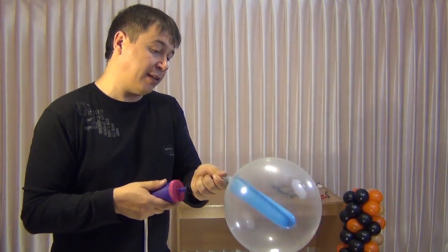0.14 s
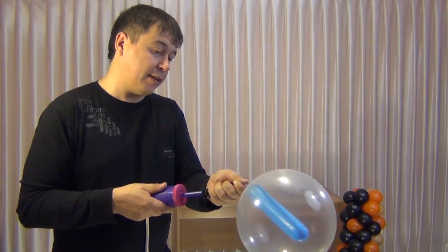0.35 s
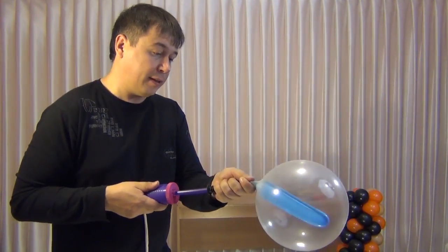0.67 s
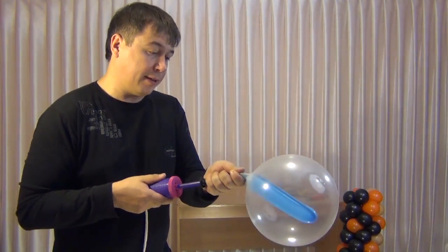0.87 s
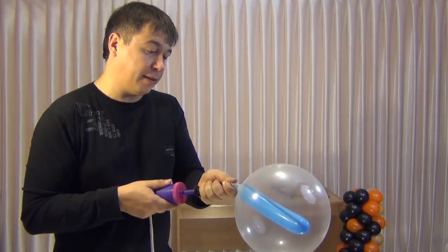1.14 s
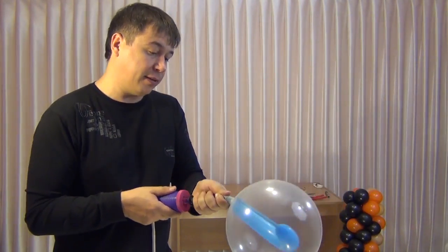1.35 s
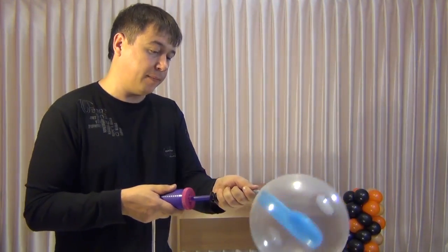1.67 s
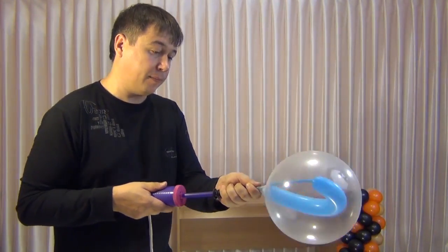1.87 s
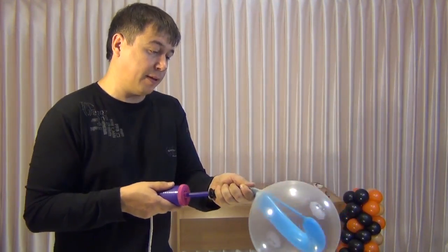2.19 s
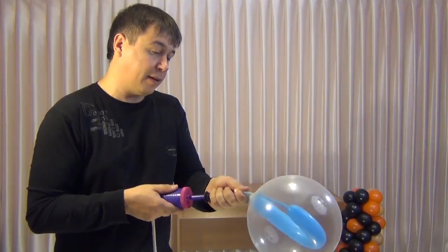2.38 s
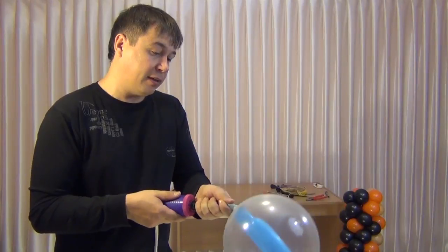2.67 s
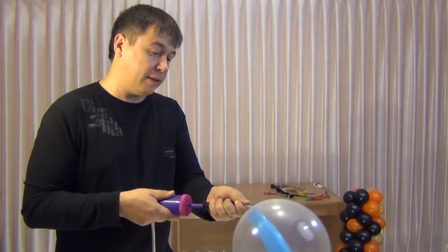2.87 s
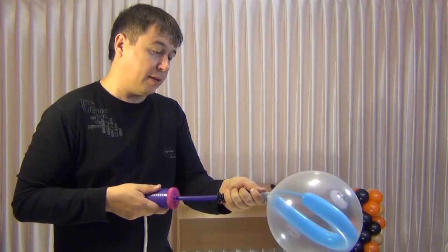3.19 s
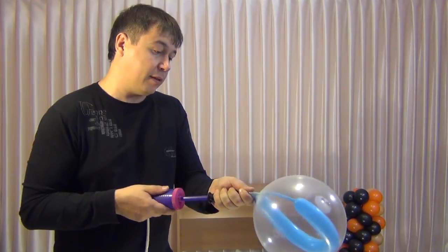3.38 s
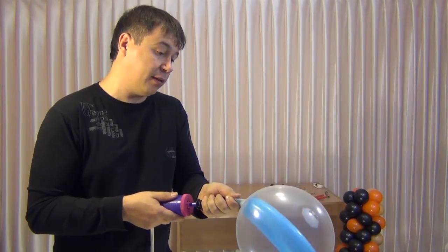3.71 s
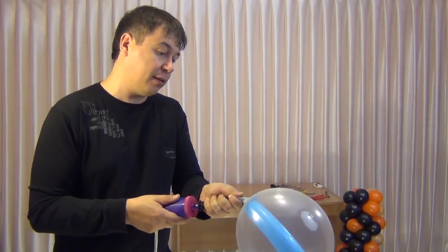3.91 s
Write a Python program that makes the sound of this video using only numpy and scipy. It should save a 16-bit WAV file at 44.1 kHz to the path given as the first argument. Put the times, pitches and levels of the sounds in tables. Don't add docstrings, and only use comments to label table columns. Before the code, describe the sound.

Close stereo sound of a plastic hand pump filling a latex balloon in a small reflective room. It opens mid-push with bright hiss and a trembling valve squeal near 1.7 kHz until about 0.2 s, then a soft bump at 0.38. A weak, thin intake follows, ending in a plastic clack at 0.95. From 1.1 to 1.6 s an even, whistling push hisses steadily and stops with a firm, higher bump at 1.65. A fuller intake runs to a brighter clack at 2.2. At 2.4 a sudden strong push starts with a falling chirp and reedy squeal, ending around 2.88 in the hardest, highest knock with rattling rebounds. A quick intake leads to ticks and a duller clack at 3.42. The last push swells more slowly from 3.5 to about 4 s. Soft room noise and a faint low drone, swelling near 0.6 and 2.4, sit behind, dipping during strokes.

```python
import sys
import numpy as np
from scipy import signal
from scipy.io import wavfile
from scipy.ndimage import uniform_filter1d

SR = 44100
rng = np.random.default_rng(int(sys.argv[2]) if len(sys.argv) > 2 else 0)


def bounce(signal):
    frames = np.transpose(np.atleast_2d(signal))
    limited = np.clip(frames, -1, 1)
    pcm = np.round(limited * 32767).astype(np.int16)
    wavfile.write(sys.argv[1], SR, pcm)


def gain_from_db(level_db):
    decades = np.asarray(level_db, float) / 20
    return 10 ** decades


N = 178264
CLOCK = np.arange(N) / SR

# time [s], level [dB], lead of the grip thud [s],
# extra snap above 2100 Hz [dB per octave].
CLACKS = [
    (.9545, -18, .0155, 0),
    (2.2147, -15.5, .0237, 1),
    (3.4214, -22, .0344, -6),
]
# time [s], level [dB], pitch [Hz].
BUMPS = [
    (0.3807, -26, 420),
    (1.6509, -11.5, 778),
    (2.8755, -10.5, 1270),
]


def evened(x):
    return x / np.sqrt(np.mean(x ** 2) + 1e-20)


def read(points, hz):
    f, value = np.transpose(points)
    return np.interp(np.log(hz + 1), np.log(f + 1), value)


def add(mix, s, sound):
    at = round(s * SR)
    part = mix[max(at, 0):][:len(sound) + min(at, 0)]
    part += sound[max(-at, 0):][:len(part)]


def follow(rows):
    s, *columns = np.transpose(sorted(rows))
    t = np.arange(s[0], s[-1], 1 / SR)
    return t, [np.interp(t, s, c) for c in columns]


def wander(count, seconds):
    size = max(int(seconds * SR), 2)
    smooth = uniform_filter1d(rng.standard_normal(count), size)
    return evened(uniform_filter1d(smooth, size))


def linger(db, per_s):
    return np.maximum.accumulate(db + per_s * CLOCK) - per_s * CLOCK


def resonate(x, hz, width):
    turn = np.exp(2j * np.pi * hz * np.arange(len(x)) / SR)
    r = np.exp(-np.pi * width / SR)
    return 2 * (turn * signal.lfilter([1 - r], [1, -r], x / turn)).real


def noise(size, streak_db, flicker_db, frames_long):
    frames, bins = 4 * N // size + 5, size // 2 + 1
    a, b, c, d, streaks, flicker = rng.standard_normal((frames, bins, 6)).T
    streaks = uniform_filter1d(streaks, 2, axis=0)
    streaks = evened(uniform_filter1d(streaks, int(frames_long), axis=1))
    flicker = uniform_filter1d(flicker, bins // 3, axis=0)
    flicker = evened(uniform_filter1d(flicker, 3, axis=1))
    return np.array([a + 1j * b, c + 1j * d]) * gain_from_db(streak_db * streaks + flicker_db * flicker)


def sound_of(z):
    size = 2 * (z.shape[1] - 1)
    return signal.istft(z, nperseg=size, noverlap=3 * size // 4)[1][:, :N]


def effort():
    # time [s], air flow [dB], piston drive [dB].
    pushes = [
        [(-.12, -25, -11), (.09, -21.5, -4), (.2, -22, -11.5), (.286, -22, -12), (.41, -46, -28), (.5, -49, -2)],
        [(1.07, -43, -1), (1.165, -22, -5), (1.23, -21.5, -6), (1.45, -22.5, -1), (1.55, -22, -17.5),
         (1.655, -41, -25), (1.685, -60, -19)],
        [(2.375, -45.5, -1), (2.404, -41, 5), (2.416, -21.5, -5), (2.6, -19.5, -5.5), (2.712, -22.5, -13.5),
         (2.822, -44.5, -30), (2.915, -46, -14)],
        [(3.435, -42, -16), (3.455, -31.5, -8), (3.514, -24, -13), (3.62, -19.5, -19), (3.77, -21.5, -2.5),
         (3.945, -23, -11), (3.99, -33, -11), (4.05, -31.5, -7)],
    ]
    pulls = [
        [(.51, -44.5, -6), (.68, -35.5, -4), (.88, -37, -6.5), (.92, -50, -1), (1.04, -47, -6)],
        [(1.695, -45, -8), (1.72, -31.5, -3), (1.79, -26.5, -4.5), (2.05, -23.5, -4.5), (2.19, -38, -7),
         (2.33, -68, -10)],
        [(2.92, -53, -14), (2.94, -32, -9), (3.02, -26, -6), (3.194, -22.5, -8), (3.31, -33, -6.5),
         (3.35, -31, -9), (3.37, -39, -20), (3.42, -35, -7)],
    ]
    clack_puff_db, bump_puff_db, puff_fade = -20, -28.5, 290
    build_s = 0.39
    s, flow_db, drive_db = np.transpose(sorted(sum(pushes + pulls, [])))
    power = gain_from_db(2 * np.interp(CLOCK, s, flow_db))
    puffs = [(c[0], c[1] + clack_puff_db) for c in CLACKS]
    puffs += [(b[0], b[1] + bump_puff_db) for b in BUMPS]
    for at, db in puffs:
        power = power + (CLOCK > at) * gain_from_db(2 * (db - puff_fade * abs(CLOCK - at)))
    strokes = [(p[0][0], 0) for p in pushes] + [(p[0][0], 1) for p in pulls]
    starts, pulling = np.transpose(sorted(strokes))
    stroke = np.maximum(np.searchsorted(starts, CLOCK) - 1, 0)
    built = np.clip((CLOCK - starts[stroke]) / build_s, 0, 1)
    return 10 * np.log10(power), np.interp(CLOCK, s, drive_db), built, pulling[stroke]


def hiss(flow_db, drive_db, built, pulling):
    # frequency [Hz], level [dB per Hz].
    nozzle = [(410, -29), (700, -22), (1180, -19.5), (1750, -14), (1940, -18.5), (2100, -17.5),
              (3590, -11.5), (3880, -8.5), (5520, -2.5), (7460, -8), (9940, 6.5), (10900, 3), (12300, -8.5),
              (15100, -5.5), (15900, -37)]
    # frequency [Hz], side minus mid [dB].
    wide = [(700, -16), (2400, -18), (4000, -13), (5200, -15.5), (6500, -7), (8300, -3.5), (9600, -14.5),
            (10800, -19), (13000, -17), (16000, -13)]
    # level over the flow [dB], share of the drive [0-1],
    # lingering [dB per s], build-up [dB], change on pull strokes [dB].
    layers = [
        (0, 0.015, 900, 0, -0.5),
        (-8.5, 0.27, 126, 6, -2),
        (-3, 1.0, 900, 3, 0.5),
        (-25.5, 0.27, 84, 7.5, -4.5),
    ]
    hz = np.fft.rfftfreq(1024, 1 / SR)
    z = noise(size=1024, streak_db=2.2, flicker_db=0.6, frames_long=22)
    z *= gain_from_db(read(nozzle, np.minimum(hz, 15200)))[:, None]
    z[1] *= gain_from_db(read(wide, hz) - 2.0)[:, None]
    crossovers = ((2700, .9), (7000, .5), (12500, .3))  # Hz, width of the crossfade
    above = [np.clip(.5 + np.log((hz + 1) / edge) / spread, 0, 1) for edge, spread in crossovers]
    shares = [above[1] - above[2], above[0] - above[1], above[2], 1 - above[0]]
    out = np.zeros((2, N))
    for share, (db, driven, per_s, build_db, pull_db) in zip(shares, layers):
        band = sound_of(z * np.sqrt(share)[:, None])
        level_db = flow_db + db + driven * drive_db + build_db * built + pull_db * pulling
        out += band / np.std(band[0]) * gain_from_db(linger(level_db, per_s))
    return out


def whistles():
    # start [s], end [s], pitch [Hz], width
    # [Hz], level [dB].
    resonances = [(-.08, 0.16, 1247, 152, -36), (.17, 0.35, 7870, 350, -29),
                  (0.171, 0.27, 8940, 300, -25.5), (0.199, 0.38, 9500, 100, -36),
                  (.6, 0.99, 4030, 300, -47.5), (-.08, 0.17, 5020, 161, -26.5),
                  (-.05, 0.1, 2710, 466, -32.5), (0.17, 0.22, 5920, 200, -29), (0, 4.4, 261.4, 25.2, -64),
                  (1.08, 1.37, 5600, 695, -29.5), (1.1, 1.42, 8100, 500, -31), (1.15, 1.63, 7050, 294, -33),
                  (1.201, 1.67, 9100, 200, -31.5), (1.799, 1.9, 5670, 200, -37.5),
                  (2.498, 2.72, 9300, 200, -28), (3.002, 3.25, 5560, 300, -40),
                  (3.602, 3.95, 4940, 314, -34), (3.552, 3.95, 9440, 200, -30.5)]
    out = np.zeros(N)
    for start, end, hz, width, db in resonances:
        x = rng.standard_normal(round((end - start) * SR))
        tone = evened(resonate(resonate(x, hz, width), hz, width))
        add(out, start, gain_from_db(db) * tone * signal.windows.tukey(len(x), .6))
    return out


def squeal(rows, harmonics_db):
    t, (hz, db, overtones_db) = follow(rows)
    turns = np.cumsum(hz * (1 + .018 * wander(len(t), .0015))) / SR
    tone = np.zeros(len(t))
    for k, h in enumerate(harmonics_db):
        stutter_db = 3 * wander(len(t), .002)
        level = gain_from_db(db + h + (k > 0) * overtones_db + stutter_db)
        tone += level * np.cos(2 * np.pi * ((k + 1) * turns + rng.random()))
    return t[0], tone


def squeals():
    # time [s], pitch [Hz], level [dB], lift of the overtones [dB].
    glides = [
        [(0, 1630, -24, 0), (.045, 1648, -21, 0), (.057, 1660, -30, 5), (.066, 1680, -23, 0),
         (.095, 1660, -30, 5), (.128, 1750, -24, -3), (.172, 1715, -29, -3), (.2, 1700, -44, 0)],
        [(2.398, 4500, -48, 0), (2.408, 4480, -34, 0), (2.4125, 4400, -24, 0), (2.415, 3400, -25, 0),
         (2.418, 2200, -33, 0)],
        [(2.4115, 1770, -48, 13), (2.415, 1800, -34, 13), (2.436, 1910, -34, 13), (2.458, 1915, -31, 5),
         (2.478, 1900, -39, 10), (2.49, 1910, -32, 3), (2.505, 1920, -41, 9), (2.565, 1960, -40, 2),
         (2.61, 2000, -50, 2)],
    ]
    # levels of a squeal's harmonics, from the fundamental up [dB].
    flap_db = [
        [2, -15, -11],
        [0, -25],
        [1, -5, 2, -8, -3, -6, -14],
    ]
    out = np.zeros(N)
    for rows, harmonics_db in zip(glides, flap_db):
        add(out, *squeal(rows, harmonics_db))
    return out


def knock(s, db, hz, cycles):
    u = np.arange(round(cycles / hz * SR)) * hz / cycles / SR
    shape = np.sin(np.pi * u ** 0.69) ** 2
    push = -np.sin(2 * np.pi * cycles * u) * shape
    return s, gain_from_db(db) * (push - shape * push.sum() / shape.sum())


def blows():
    # time [s], peak [dB], pitch [Hz], length [cycles].
    ticks = [(.342, -27, 2150, 3.5), (.3733, -26, 1760, 3.1), (.888, -38, 390, 3),
             (.8953, -29.5, 900, 1.35), (.8955, -30, 2300, 2.1), (1.648, -29, 2960, 3.1),
             (2.7725, -32.5, 800, 1.04), (2.79, -41, 1410, 4.2), (2.815, -49, 1200, 1.3),
             (2.855, -63, 1750, 3.5), (2.873, -15, 1010, 2.33), (2.8805, -11, 1330, 7.3),
             (2.911, -19.5, 1330, 5.5), (3.352, -37, 740, 1.5), (3.368, -34, 1900, 1.9),
             (3.378, -41, 1900, 4.6)]
    # pitch [Hz], level [dB], length [cycles].
    cap = [(265, -8.5, 2.34), (561, -3, 1.24), (1140, 1, 1.54), (1570, 0.5, 2.06), (2045, 0.5, 4.4),
           (3060, -2, 4.23), (3720, -4.5, 6.5), (6060, -10.5, 5.5)]
    # pitch ratio, level [dB], length [cycles], delay [s].
    skin = [
        (.72, -6.5, 1.91, -.0016),
        (1, -2, 3.3, 0),
        (1.25, -22, 2.1, 0.0065),
    ]
    # pitch [Hz], level [dB], length [cycles].
    barrel = [(280, -16, 1.6), (580, -8.5, 2.3), (1700, -8.5, 3.4), (2930, -11, 1.5)]
    snap_hz, barrel_lead_s = 2100, 0.00246
    thud_hz, thud_db, thud_cycles = 249.4, -15, 3.9
    rows = list(ticks)
    for s, db, lead, snap_db in CLACKS:
        rows.append((s - lead, db + thud_db, thud_hz, thud_cycles))
        for hz, d, c in cap:
            snap = snap_db * max(np.log2(hz / snap_hz), 0)
            rows.append((s - 0.18 / hz, db + d + snap, hz, c))
    for s, db, hz in BUMPS:
        rows += [(s + delay, db + d, hz * ratio, c) for ratio, d, c, delay in skin]
        rows += [(s - barrel_lead_s, db + d, f, c) for f, d, c in barrel]
    return rows


def pump_knocks():
    out = np.zeros(N)
    for row in blows():
        add(out, *knock(*row))
    return signal.sosfilt(signal.butter(2, 180, "high", fs=SR, output="sos"), out)


def room(x):
    # delay [s], level [dB].
    echoes = [(.0048, -6), (.0085, -10), (.013, -8), (.0185, -12), (.027, -14), (.039, -18)]
    # frequency [Hz], time to fall 60 dB [s].
    decay = [(200, 0.44), (530, 0.6), (1390, 0.44), (3680, 0.5)]
    taps = np.zeros((2, SR))
    at = np.arange(300, SR - 20, 20) + rng.integers(0, 20, (2, (SR - 301) // 20))
    np.put_along_axis(taps, at, rng.choice([-1., 1.], at.shape), 1)
    hz, t, z = signal.stft(taps, SR, nperseg=256)
    z[1] /= 1 + (hz[:, None] / 3200) ** 4
    t60 = np.clip(read(decay, hz), .05, 2)[:, None]
    tail = signal.istft(z * gain_from_db(-60 * t / t60), SR, nperseg=256)[1]
    tail *= gain_from_db([[1.2], [-12.5]]) / np.linalg.norm(tail[0])
    for s, db in echoes:
        tail[0, round(s * SR)] += gain_from_db(db)
    return signal.fftconvolve(x[None], tail, axes=1)[:, :N]


def air():
    # frequency [Hz], level [dB per Hz].
    colour = [(12, -48), (20, -8), (85, -9), (242, 8.5), (585, -3.5), (889, 2), (1120, -9.5), (1350, -1),
              (1500, -3), (2540, -8.5), (3000, -10.5), (3900, -4.5), (6600, -120)]
    # frequency [Hz], left-right likeness [-1 to 1].
    likeness = [(30, -0.92), (60, -0.56), (120, 0.72), (300, 0.9), (1000, 0.92)]
    # time [s], level [dB].
    street = [(0, 3), (.8, -4), (1.5, 1.5), (2.25, 0.5), (2.65, -4), (3.3, -7.5), (4.04, 0)]
    hz = np.fft.rfftfreq(2048, 1 / SR)
    z = noise(size=2048, streak_db=3.0, flicker_db=1.74, frames_long=24)
    z = z * gain_from_db(read(colour, hz))[:, None]
    same = np.clip(read(likeness, hz), -1, 1)[:, None]
    z[1] = same * z[0] + np.sqrt(1 - same ** 2) * z[1]
    deep = np.clip((130 - hz) / 40, 0, 1)[:, None]
    rumble = evened(sound_of(z * np.sqrt(deep))) * gain_from_db(-60 - 4.5 * wander(N, .1))
    hush = evened(sound_of(z * np.sqrt(1 - deep))) * gain_from_db(-45.5)
    return (rumble + hush) * gain_from_db(np.interp(CLOCK, *np.transpose(street)))


def drones():
    # start [s], loudest [s], end [s], pitch at the loudest [Hz], level [dB].
    partials = [
        (0, .53, .9, 97, -47),
        (.4, .62, .95, 150, -45),
        (2.0, 2.4, 2.6, 71.5, -42),
        (2.08, 2.4, 2.85, 147, -39),
        (1.3, 1.5, 1.66, 184, -51),
    ]
    glide_per_s, swell_db = 0.11, -16.5
    out = np.zeros(N)
    for start, loudest, end, hz, db in partials:
        t = np.arange(start, end, 1 / SR)
        level = gain_from_db(db + np.interp(t, [start, loudest, end], [swell_db, 0, swell_db]))
        turns = np.cumsum(hz * (1 + glide_per_s * (t - loudest))) / SR
        add(out, start, level * np.sin(2 * np.pi * turns) * signal.windows.tukey(len(t), .2))
    return out * gain_from_db([[3.5], [-4.5]])


def scene():
    duck_share, duck_from_db, recover = 0.29, -45, 65
    flow_db, *arm = effort()
    tones = whistles() + squeals()
    knocks = pump_knocks()
    mid, side = hiss(flow_db, *arm) + room(knocks + gain_from_db(-17) * tones)
    mid = mid + tones + knocks
    excess_db = np.maximum(linger(flow_db, recover) - duck_from_db, 0)
    duck_db = duck_share * uniform_filter1d(excess_db, size=400)
    return np.array([mid + side, mid - side]) + (air() + drones()) / gain_from_db(duck_db)


def band_limit(x):
    return signal.sosfilt(signal.butter(12, 16060, fs=SR, output="sos"), x)


def record(dry):
    low_pass = signal.firwin(1023, 15930, window=("kaiser", 9), fs=SR)
    limited = signal.oaconvolve(dry, low_pass[None], "same")
    return band_limit(limited)


dry = scene()
out = record(dry)
bounce(out)
```